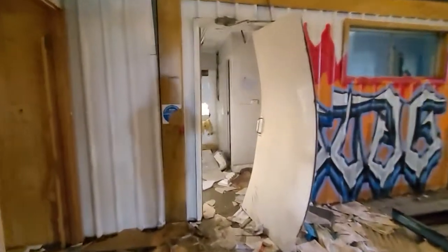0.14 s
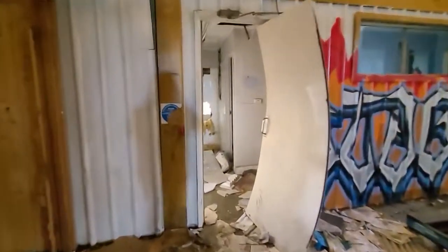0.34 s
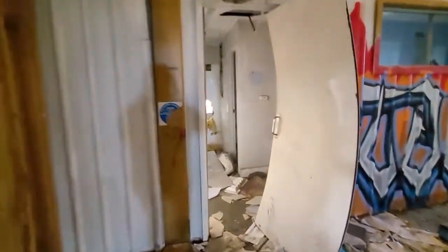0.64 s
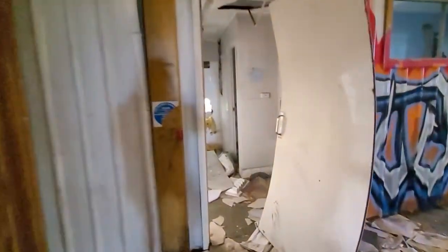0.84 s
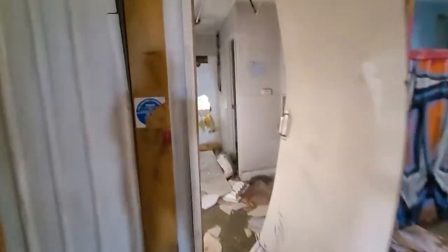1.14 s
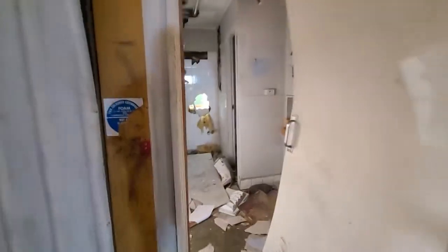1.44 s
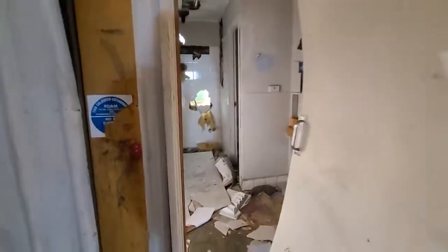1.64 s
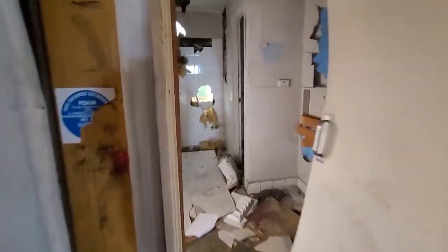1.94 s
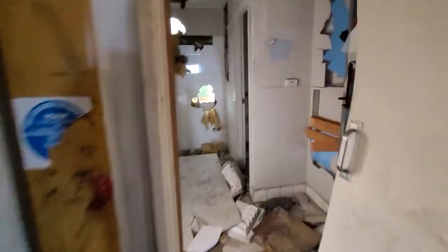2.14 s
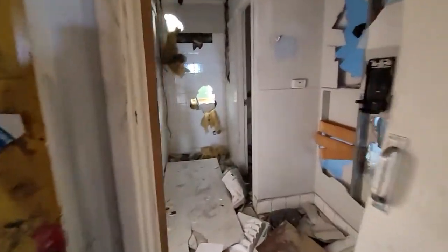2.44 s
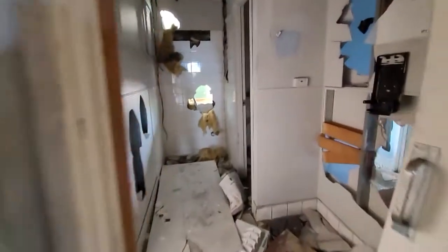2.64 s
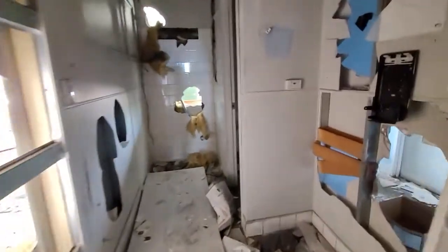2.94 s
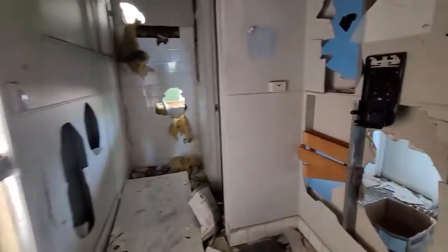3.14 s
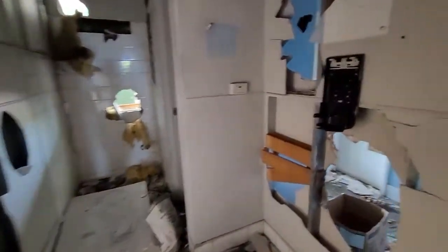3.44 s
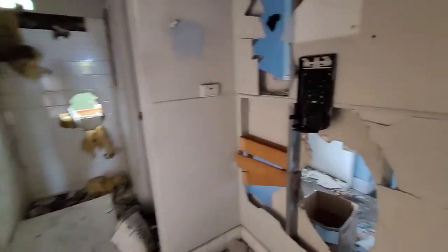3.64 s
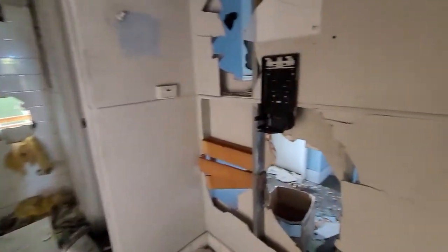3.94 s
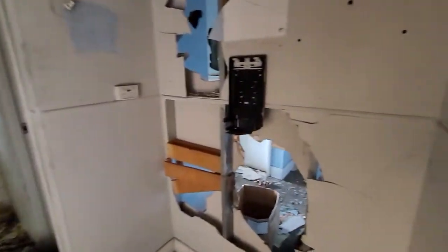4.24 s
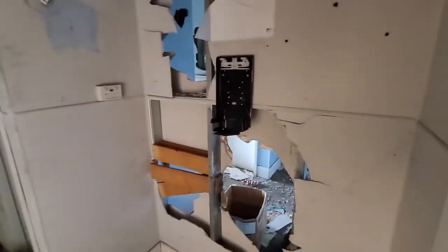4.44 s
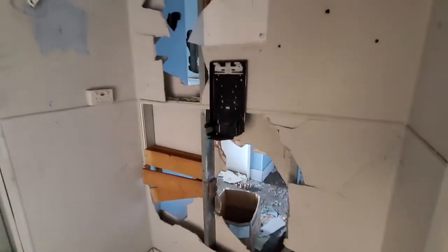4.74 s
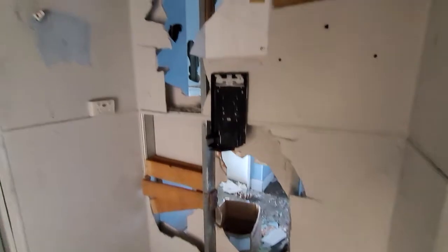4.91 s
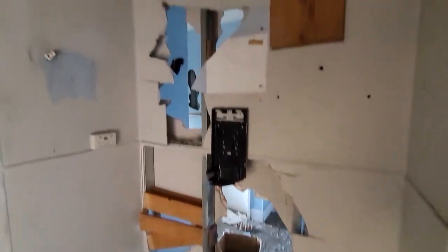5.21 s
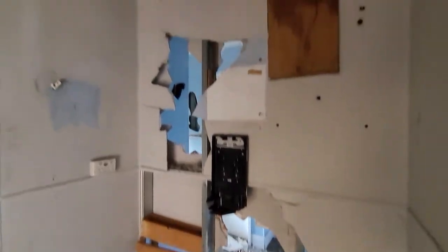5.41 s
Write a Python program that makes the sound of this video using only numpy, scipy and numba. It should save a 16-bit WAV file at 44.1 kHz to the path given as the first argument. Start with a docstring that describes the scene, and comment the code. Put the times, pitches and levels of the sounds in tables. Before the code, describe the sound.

A handheld stereo microphone moves with a walker over loose rubble. Sharp snaps, gritty crunches and papery dragging ring briefly through a bare hall, with soft dull thuds beneath. Low outdoor rumble and a faint machine hum sit behind. Through the doorway the space tightens, the hum disappears and the debris sounds thin out to small ticks, with a very faint pulsing chirp before near stillness.

```python
"""Footsteps carry a handheld stereo recorder from a bare hall through a doorway into a small wrecked room.
Plaster shards, paper and grit snap and crunch underfoot: noise bursts with wavering rings, over dull noise thuds.
Dying filtered noise makes the echoes of hall and room; treble noise is the tail of an earlier step.
A distant machine hums as a drifting sine, loud in the hall; a faint insect-like chirp is a pulsed sine late on.
Shaped noise gives the outdoor rumble and the microphone hiss."""
import sys
import numpy as np
from scipy import signal
from scipy.fft import rfft, irfft, next_fast_len
from scipy.io import wavfile
from scipy.ndimage import uniform_filter1d
from numba import njit

SR = 44100
rng = np.random.default_rng(int(sys.argv[2]) if len(sys.argv) > 2 else 0)


def wrap_up_sound(samples):
    """Save the sound to the file named by the first command line argument, as 16-bit audio."""
    columns = np.atleast_2d(samples).T
    # keep every value between -1 and 1, then stretch to whole-number steps
    tamed = np.clip(columns, -1, 1)
    steps = np.round(tamed * 32767).astype(np.int16)
    wavfile.write(sys.argv[1], SR, steps)


N = 245637

# where the feet are heard: (time [s], lag of the left port [ms])
FOOT_LAG = [(0, -0.23), (.55, -0.019), (1.15, 0.094), (1.7, 0.084), (2.1, -0.17), (2.45, -0.058),
            (2.6, 0.25), (3.1, 0.054), (3.7, 0.2), (4.2, 0.25), (5.57, 0.2)]
# colour of the debris as the ports hear it: (frequency [Hz], gain [dB])
DEBRIS_COLOUR = [(250, -2.5), (700, -4), (1200, -3.5), (2000, -1.5), (3200, -5.5), (4500, -4), (6500, -7.5),
                 (8000, -4), (9700, -10.5), (12000, -3), (16000, -16.5)]


def snaps():
    """Shards break or knock audibly, each with its own mix of noise bands and ring."""
    # shards underfoot, levels ahead of the debris colour: (time [s], crack [dB], treble [dB], body [dB],
    # knock pitch [Hz], knock peak [dB], t60 [s], left minus right in crack and treble [dB])
    shard_breaks = [(0.065, -50.5, -55, -64, 1400, -38, 0.024, 6),
                    (0.434, -37.5, -41, -36, 2070, -61, 0.053, 10),
                    (0.527, -48, -56, -61, 1630, -48, 0.014, -12),
                    (0.5486, -24.5, -32.5, -34.5, 1580, -26, 0.016, -1),
                    (0.557, -55, -40, -58, 4500, -28, 0.0089, 18),
                    (1.0725, -72, -85, -46, 1210, -54, 0.02, -1),
                    (1.1312, -48, -54, -27, 414, -19.5, 0.0087, 1),
                    (1.1436, -31.5, -46, -24.5, 1323, -30, 0.051, -2),
                    (1.1576, -27.5, -35, -24, 1720, -49, 0.042, -12),
                    (1.1669, -13.5, -23, -48, 954, -11, 0.014, 5),
                    (1.186, -32, -44, -27, 1423, -30, 0.051, 19),
                    (1.2105, -20, -28, -54, 1800, -22.5, 0.03, -4.5),
                    (1.3567, -51, -36, -32.5, 1070, -48, 0.024, 4),
                    (1.3727, -54, -53, -40, 1880, -35, 0.054, -4),
                    (1.403, -29.5, -59, -29.5, 1960, -22, 0.008, 2.5),
                    (1.556, -48.5, -77, -55, 1550, -42.5, 0.044, 4),
                    (1.6535, -42, -44, -35, 718, -28.5, 0.034, 2),
                    (1.7417, -56, -65, -43, 2150, -40.5, 0.0088, 3),
                    (1.76, -55, -38.5, -68, 2093, -62, 0.014, -4),
                    (1.808, -44.5, -47, -41, 1290, -58.5, 0.053, 3),
                    (1.869, -47.5, -46, -60, 1270, -59, 0.068, 9),
                    (1.9098, -44, -62, -40, 756, -40, 0.12, 12),
                    (1.9478, -31, -31.5, -40, 1388, -28, 0.088, 0),
                    (1.9618, -36, -41, -22.5, 677, -15, 0.041, 8),
                    (2.0444, -14.5, -23, -37, 2200, -29, 0.034, 1),
                    (2.0723, -20, -16, -51, 2320, -35, 0.026, -2),
                    (2.0935, -14.5, -11.5, -23, 2230, -41, 0.025, 1.5),
                    (2.1561, -17.5, -10, -20.5, 1670, -18.5, 0.031, 4.5),
                    (2.2549, -43, -31.5, -39, 1670, -49, 0.018, 1.5),
                    (2.2903, -36, -30.5, -53, 2010, -49, 0.032, 4),
                    (2.4151, -56, -49, -61.5, 767, -41.5, 0.048, 8),
                    (2.4982, -47, -40, -47.5, 770, -39.5, 0.043, 2),
                    (2.5615, -30.5, -37, -39, 1157, -35, 0.066, -1),
                    (2.595, -29, -29, -35, 3740, -31, 0.073, 1.5),
                    (2.6287, -35.5, -58, -46, 950, -23.5, 0.021, -10),
                    (2.689, -42, -55, -35, 1240, -25, 0.026, 10),
                    (2.7252, -31, -37, -58, 1920, -21.5, 0.018, -1.5),
                    (2.7733, -28, -26.5, -52, 2060, -32, 0.017, -1),
                    (2.8377, -27, -28.5, -35, 2064, -25, 0.026, 5),
                    (2.8681, -27, -23, -28.5, 1810, -26, 0.017, 2.5),
                    (2.9175, -38, -56, -66, 2050, -31.5, 0.02, 1.5),
                    (2.9516, -57, -74, -32.5, 455, -24, 0.016, -9),
                    (2.9728, -42.5, -58, -33.5, 759, -29.5, 0.078, 6),
                    (3.005, -41, -57, -29.5, 484, -24.5, 0.057, 3),
                    (3.058, -53, -71, -36.5, 477, -27, 0.018, 17),
                    (3.086, -33, -51, -45, 2040, -45, 0.013, 0),
                    (3.1924, -42, -41, -68, 1840, -44, 0.011, -1),
                    (3.2092, -47, -41, -67, 1890, -42, 0.0093, -8),
                    (3.2349, -39.5, -32, -53, 1230, -56, 0.012, -2),
                    (3.416, -48, -50, -53, 1340, -42, 0.033, 1),
                    (3.337, -47, -70, -56, 2630, -43, 0.0095, 7),
                    (3.5086, -42, -51, -45, 1250, -35.5, 0.029, -1),
                    (3.5398, -34, -56, -58, 966, -27.5, 0.032, -7),
                    (3.559, -37, -41, -38, 1870, -47, 0.03, 13),
                    (3.5753, -31, -45, -50, 2185, -32.5, 0.024, -14),
                    (3.7375, -47, -46, -60, 1180, -46, 0.014, 5),
                    (3.7857, -60, -65, -59, 1530, -37, 0.042, 16),
                    (3.7988, -52, -56, -44, 1414, -26, 0.055, -9),
                    (3.8498, -47, -36, -59, 1463, -22, 0.03, -4),
                    (3.9079, -59, -64, -36, 1410, -51, 0.013, 11),
                    (3.9427, -45, -61, -64, 790, -37, 0.02, 0),
                    (4.0246, -61, -61, -65, 1430, -40, 0.037, -10),
                    (4.1698, -59, -56, -31.5, 1470, -23, 0.0095, -5),
                    (4.1951, -37, -35, -43, 3920, -31, 0.0077, -4),
                    (4.312, -50, -48, -50, 1530, -46, 0.035, -6),
                    (4.445, -63, -58, -56.5, 1100, -47, 0.035, -11),
                    (4.5398, -66, -52.5, -50.5, 1500, -49.5, 0.0099, -18),
                    (4.86, -70, -77, -51, 1106, -55.5, 0.038, 5.5)]
    lag_scatter_ms = 0.04
    s, crack_db, treble_db, body_db, hz, knock_db, t60, pan_db = np.transpose(shard_breaks)
    lag_ms = curve(FOOT_LAG)[(s * SR).astype(int)] + lag_scatter_ms * rng.standard_normal(len(s))
    return play(s, np.array([body_db, crack_db, treble_db, knock_db]), t60, pan_db, hz, lag_ms)


def crunch(count=12000):
    """Dense little breaks, mostly weak and a few strong, follow the load of the sole."""
    pick = rng.random((count, 3)).T
    spread = rng.standard_normal((count, 4)).T
    s = 0.002 + pick[0] * (N / SR - 0.01)
    at = (s * SR).astype(int)
    crack, treble, body = load(s)
    size_db = -3 * np.log(1 - pick[1]) + 3 * wander(60)[at]
    # rows: body, crack, treble, ring
    levels = size_db + 20 * np.log10([body, crack, treble, body])
    levels += np.array([[-12], [-8], [-8], [-11]])
    levels += 2.5 * np.array([spread[0], 0 * s, spread[1], spread[0]])
    t60 = 0.0032 * np.exp(0.17 * spread[2])
    ring_hz = 300 * 7 ** pick[2]
    lag_ms = curve(FOOT_LAG)[at] + 0.13 * spread[1]
    return play(s, levels, t60, 2.7 * spread[3], ring_hz, lag_ms)


def load(s):
    """Gain of crack, treble and body at times s: presses swell and ease off over a low shuffle."""
    # each press of a sole on small bits, rise and fall spanning 20 dB, levels relative:
    # (time [s], rise [s], hold [s], fall [s], crack [dB], treble [dB], body [dB])
    sole_presses = [(0.001, .03, 0.0043, 0.038, -58, -47.5, -44),
                    (0.438, 0.0074, 0.012, 0.025, -41, -36, -45),
                    (0.55, 0.009, .05, 0.066, -44, -63.5, -53),
                    (1.166, 0.029, 0.011, 0.045, -32, -45.5, -34),
                    (1.2, 0.047, 0.037, 0.032, -35, -40, -34.5), (1.378, 0.046, 0.037, 0.03, -47, -51, -48),
                    (1.652, 0.022, 0.024, 0.14, -59.5, -56, -64),
                    (1.806, 0.016, 0.013, .03, -50, -63.5, -47),
                    (1.875, 0.016, 0.02, 0.049, -61, -51.5, -74),
                    (1.961, 0.059, 0.056, 0.21, -46, -41.5, -36.5),
                    (2.062, .12, 0.097, 0.073, -38.5, -37.5, -49),
                    (2.175, .03, 0.01, 0.034, -45, -32.5, -55),
                    (2.579, 0.027, 0.042, 0.093, -37.5, -38, -41),
                    (2.682, 0.1, 0.027, 0.072, -51, -72, -41.5), (2.831, 0.13, 0.038, 0.057, -39, -42, -39),
                    (2.995, 0.19, 0.13, 0.048, -56.5, -58, -59.5), (3.216, 0.069, .05, 0.13, -68, -59, -91),
                    (3.519, 0.036, 0.042, 0.21, -44.5, -47.5, -47),
                    (3.832, 0.083, 0.054, 0.037, -43.5, -49, -44),
                    (4.01, 0.21, 0.05, 0.16, -65.5, -61, -79), (4.177, 0.02, 0.027, 0.1, -66, -62, -69),
                    (4.307, 0.016, 0.014, 0.043, -64, -60, -74.5),
                    (4.354, .02, 0.021, 0.085, -59, -54, -72), (4.525, .015, 0.054, 0.057, -68, -72, -57),
                    (5.419, 0.19, 0.071, 0.22, -80, -84.5, -75.5)]
    # the feet keep dragging through loose paper between presses
    shuffle_start_s, shuffle_end_s, shuffle_edge_s = 1.2, 4.09, 0.073
    shuffle_db = np.array([-66.5, -66.5, -57])  # crack, treble, body
    outside = np.maximum(np.maximum(shuffle_start_s - s, s - shuffle_end_s), 0)
    gains = undb(shuffle_db[:, None] - 20 * outside / shuffle_edge_s)
    for peak, rise, hold, fall, *db in sole_presses:
        before = (peak - s) / max(rise, 0.004)
        after = (s - peak - hold) / max(fall, 0.004)
        away = np.maximum(np.maximum(before, after), 0)
        gains = gains + undb(np.array(db)[:, None] - 20 * away)
    return gains


def play(s, db, t60, pan_db, hz, lag_ms):
    """Bursts take their place in the stereo picture and are filtered to their bands."""
    # body, crack, treble: (low edge [Hz], high edge [Hz])
    break_bands = [(250, 1200), (1200, 5000), (5000, 16500)]
    spread = 0.055  # share of its t60 that a break takes to spread through the shard
    tick_db = 0.5  # the first half millisecond of a break stands out
    start = (s * SR).astype(np.int64) - 20
    lag = np.clip(np.round(lag_ms * SR / 1000), -18, 18).astype(np.int64)
    # long waves bend round the recorder, so low sounds are shadowed less
    shadow = np.array([0 * s + 0.26, 0 * s + 1, 0 * s + 1, np.clip(hz / 1500, 0, 1)])
    pan = undb(shadow * pan_db / 2)
    noise = rng.standard_normal((4, N))
    rows = bursts(start, lag, np.clip(t60, 0.002, 0.3), undb(db), pan, noise, hz, spread, undb(tick_db))
    return sum(band(rows[k], break_bands[k]) for k in range(3)) + rows[3]


@njit
def bursts(start, lag, t60, size, pan, noise, hz, spread, tick):
    """Tiny fractures (rows 0-2, one per band) and a ring (row 3) swell and die in each break, at both ports."""
    out = np.zeros((4, 2, noise.shape[1]))
    for e in range(len(start)):
        span = t60[e] * 44100
        step = 2 * np.pi * hz[e] / 44100
        phase = 0.
        for i in range(min(int(span), noise.shape[1] - start[e] - 40)):
            at = start[e] + i
            # a loose shard rattles, so its ring wavers
            phase += step + .3 * np.sqrt(step) * noise[3, at]
            env = (1 - np.exp(-(i + 1) / (spread * span))) * 10 ** (-3 * (i / span) ** 1.3)
            for k in range(4):
                left = noise[k, at] * (1 + tick * np.exp(-i / 25)) if k < 3 else np.sin(phase)
                # all the treble reaches the right port by other paths
                right = noise[3, at] if k == 2 else left
                out[k, 0, at + 20 + lag[e]] += left * env * size[k, e] * pan[k, e]
                out[k, 1, at + 20] += right * env * size[k, e] / pan[k, e]
    return out


def thuds():
    """Short dull swells of narrow-band noise as weight settles on the boards."""
    # soft weight on the floor: (time [s], pitch [Hz], peak gain of the noise [dB], half length [s])
    floor_thuds = [(0.965, 212, -43.5, 0.071), (1.987, 249, -44, 0.032), (2.59, 272, -50, 0.024),
                   (3.662, 290, -40.5, 0.008)]
    t = np.arange(N) / SR
    out = 0
    for s, hz, db, half in floor_thuds:
        swell = undb(db) * np.exp(-((t - s) / half) ** 2)
        out = out + swell * band(rng.standard_normal(N), (hz * 0.93, hz * 1.18))
    return out


def echo(x, t60s, gap_s):
    """Walls return a dying wash of reflections, each band fading at its own rate."""
    t60_hz = [400, 2000, 5000, 12000]  # where the decay times t60s [s] hold
    t = np.arange(int(1.5 * SR)) / SR
    rise = np.clip(t / gap_s, 0, 1)
    washes = []
    for _ in range(2):
        noise = rng.standard_normal(len(t))
        tail = 0
        for hz in 220 * 2. ** np.arange(0, 6.1, 0.5):
            t60 = np.interp(np.log(hz), np.log(t60_hz), t60s)
            strip = band(noise, (hz / 1.19, hz * 1.19)) * np.sqrt(hz)
            tail = tail + rise * strip * 10 ** (-3 * t / t60)
        tail = tail / np.sqrt(np.sum(tail ** 2))
        washes.append(signal.fftconvolve(x, tail)[:N])
    return diffuse(*washes)


def earlier_step():
    """The treble of a step just gone still hangs in the hall as decaying noise."""
    start_db, t60_s = -63.5, 3.4
    wash = colour(band(rng.standard_normal((2, N)), (3800, 13500)), DEBRIS_COLOUR)
    return diffuse(*wash) * undb(start_db - 60 * np.arange(N) / SR / t60_s)


def hum():
    """A low distant machine tone, a sine drifting in pitch and level, fades behind the doorway."""
    # mean course ahead of the drift and the port gains: (time [s], level [dB])
    hum_course = [(0, -45), (0.4, -39), (1.05, -46.5), (1.65, -43.5), (2.05, -38), (2.5, -41.5), (3.1, -55),
                  (3.4, -103)]
    pitch_hz, drift_hz = 88.55, 0.84
    tone = np.sqrt(2) * undb(curve(hum_course) + 1.5 * wander(6.5))
    phase = 2 * np.pi * np.cumsum(pitch_hz + drift_hz * wander(4)) / SR
    left = undb(-0.84) * np.sin(phase + 0.14)
    right = undb(-2.5) * np.sin(phase - 0.1)
    return tone * np.array([left, right])


def chirps():
    """A thin steady pitch in soft regular pulses, its level wavering as it comes from afar."""
    # mean rms at the top of a pulse: (time [s], level [dB])
    chirp_course = [(3.25, -90), (3.34, -70), (4.1, -68), (4.5, -69), (4.69, -72), (4.75, -79), (5.0, -90)]
    pitch_hz = 2750
    first_s, every_s, half_s = 3.375, 0.185, 0.02
    lead_s, lead_db = 0.048, -6  # weaker pulses go before and after each one
    between_db = -17  # the pitch never quite stops between pulses
    t = np.arange(N) / SR
    near = (t - first_s + every_s / 2) % every_s - every_s / 2  # time from the nearest pulse

    def pulse(s):
        """One soft swell, s seconds from the main pulse."""
        return np.exp(-((near - s) / half_s) ** 2)

    env = np.maximum(pulse(0), undb(lead_db) * (pulse(-lead_s) + pulse(lead_s)))
    env = np.maximum(env, undb(between_db))
    env = env * undb(curve(chirp_course, -200) + 1.5 * wander(40))
    return np.sqrt(2) * env * np.sin(2 * np.pi * pitch_hz * t + np.array([[0], [1.6]]))


def air():
    """Half-octave bands of noise drift a little and swell in the open hall, the hiss on top staying steady."""
    # outdoor rumble down to microphone hiss: (frequency [Hz], relative level [dB])
    air_colour = [(25, -30.5), (45, 1.5), (65, 2.5), (100, -5), (160, -11), (270, -11.5), (420, -22.5),
                  (800, -21), (1500, -29), (2100, -41), (3000, -53), (6000, -54), (16000, -54)]
    level_db = -50.5  # rms of both ports averaged, ahead of the swell
    swell = doorway(6, 1.5)  # dB in the open hall and in the room
    hz = np.fft.rfftfreq(N, 1 / SR)
    pair = diffuse(*colour(rng.standard_normal((2, N)), air_colour))
    spectra = rfft(pair * undb(level_db) / np.std(pair.mean(0)))
    out = 0
    for k in range(20):
        share = np.clip(1 - np.abs(2 * np.log2((hz + 1) / 25) - k), 0, 1)
        reach = np.clip(1.3 - (k / 12) ** 2, 0, 1)  # full in the rumble, none in the hiss
        out = out + irfft(spectra * share, N) * undb(reach * (swell + 0.27 * wander(0.68)))
    return out


def doorway(before, after):
    """A value glides from its hall to its room setting as the walker steps through."""
    step_s, span_s = 2.73, 1
    inside = 0.5 + 0.5 * np.tanh((np.arange(N) / SR - step_s) / span_s)
    return before + (after - before) * inside


def diffuse(a, b):
    """Sound from all sides at two spaced ports: alike in the bass, unrelated above."""
    ports_m = 0.17  # spacing of the microphone ports
    size = next_fast_len(N)
    hz = np.fft.rfftfreq(size, 1 / SR)
    alike = np.clip(0.98 * np.sinc(2 * hz * ports_m / 343), -1, 1)  # speed of sound 343 m/s
    mid = rfft(a, size) * np.sqrt((1 + alike) / 2)
    side = rfft(b, size) * np.sqrt((1 - alike) / 2)
    return np.array([irfft(mid + side, size)[:N], irfft(mid - side, size)[:N]])


def colour(x, table):
    """Gain by frequency from (Hz, dB) points."""
    at, db = np.transpose(table)
    hz = np.fft.rfftfreq(N, 1 / SR)
    return irfft(rfft(x) * undb(np.interp(np.log(hz + 1), np.log(at), db)), N)


def band(x, edges):
    """Band-pass scaled to keep the rms of white noise."""
    sos = signal.butter(2, edges, "band", fs=SR, output="sos")
    return signal.sosfilt(sos, x) * np.sqrt(SR / 2 / (edges[1] - edges[0]))


def wander(rate):
    """Random levels held 1 / rate s and slewed twice, to drift without steps."""
    k = int(SR / rate)
    held = np.repeat(rng.standard_normal(N // k + 1), k)
    return 0.78 * uniform_filter1d(uniform_filter1d(held, k), k)[:N]


def curve(table, outside=None):
    """Value of a (time [s], value) table at every sample."""
    s, value = np.transpose(table)
    return np.interp(np.arange(N) / SR, s, value, outside, outside)


def undb(db):
    """Gain of a level in dB."""
    return 10 ** (np.asarray(db) / 20)


def scene():
    """Steps sound dry and through the echoes of hall and room, whose shares glide at the doorway."""
    hall_t60_s, room_t60_s = [1, 0.74, 0.71, 0.51], [0.31, 0.26, 0.27, 0.29]
    feet = colour(snaps() + crunch(), DEBRIS_COLOUR)
    # echo shares in dB, before and after the doorway
    hall = echo(feet[0] * undb(doorway(-10, -24.5)), hall_t60_s, gap_s=0.008)
    room = echo(feet[1] * undb(doorway(-6.5, -5.5)), room_t60_s, gap_s=0.0048)
    return feet + hall + room + thuds() + earlier_step() + hum() + chirps() + air()


def record(dry):
    """Each port loses a little deep bass, at unequal pitches; the recorder cuts the top steeply."""
    port_cut_hz, top_hz = [11.5, 50], 15900
    ports = []
    for hz, x in zip(port_cut_hz, dry):
        ports.append(signal.sosfilt(signal.butter(1, hz, "high", fs=SR, output="sos"), x))
    return signal.sosfilt(signal.ellip(10, 0.2, 70, top_hz, fs=SR, output="sos"), ports)


dry = scene()
out = record(dry)
wrap_up_sound(out)
```